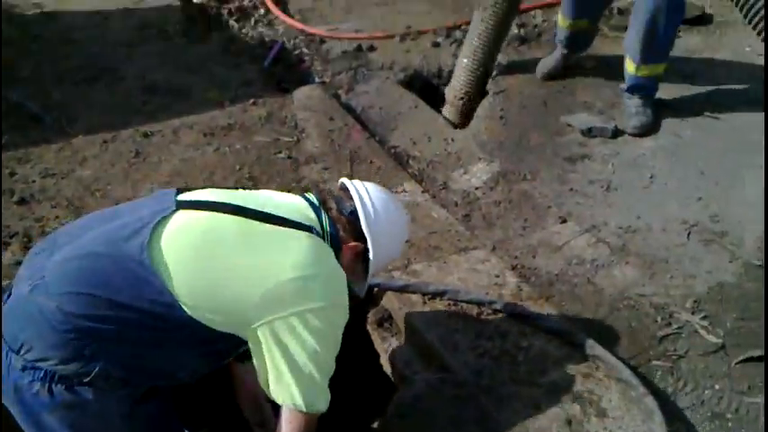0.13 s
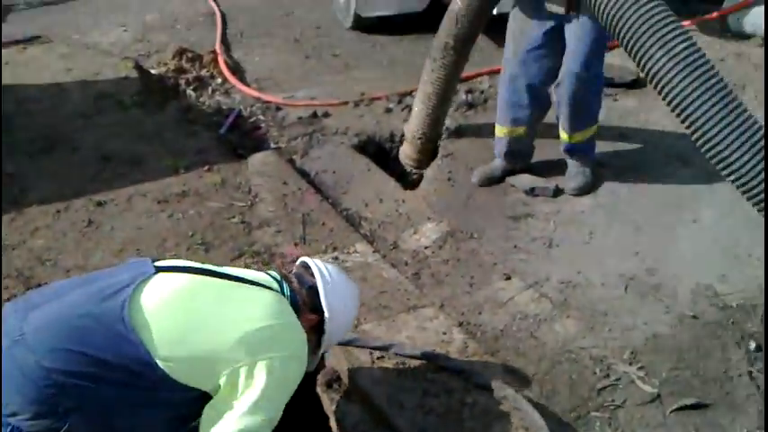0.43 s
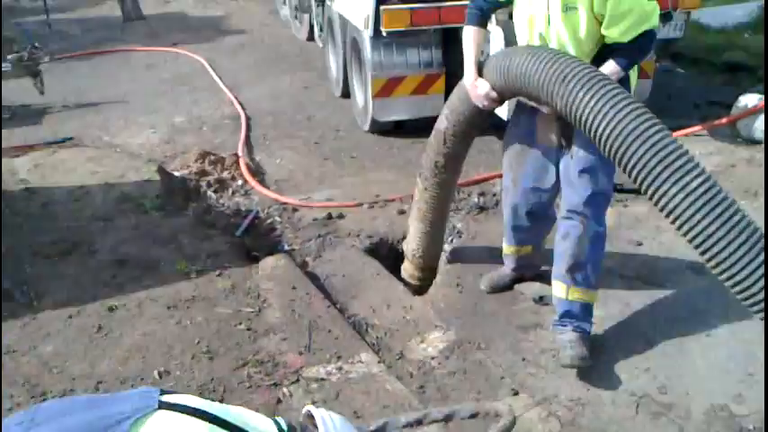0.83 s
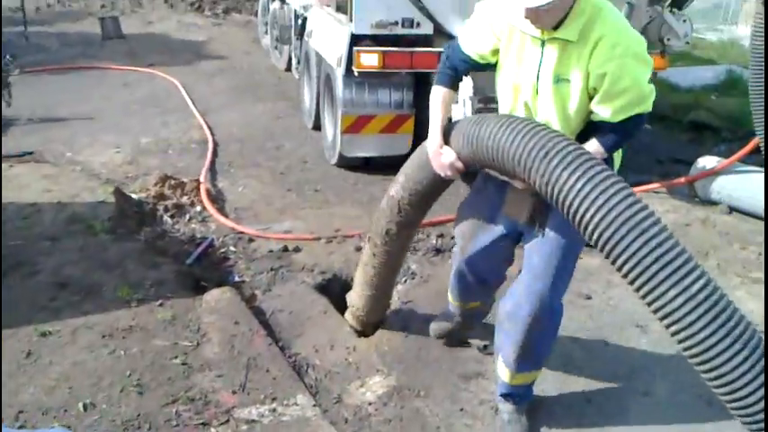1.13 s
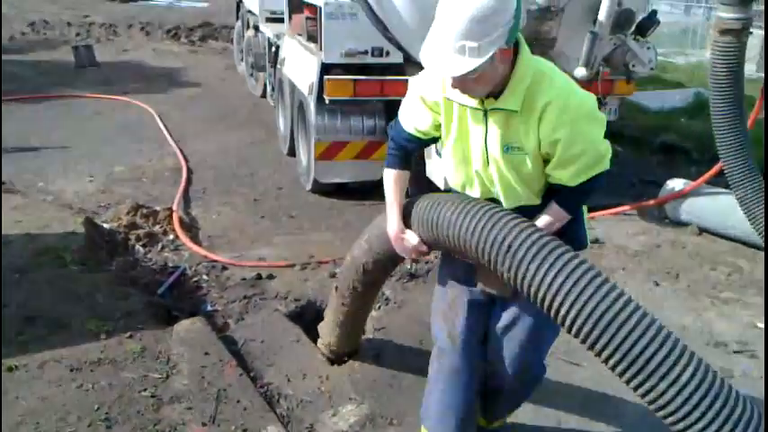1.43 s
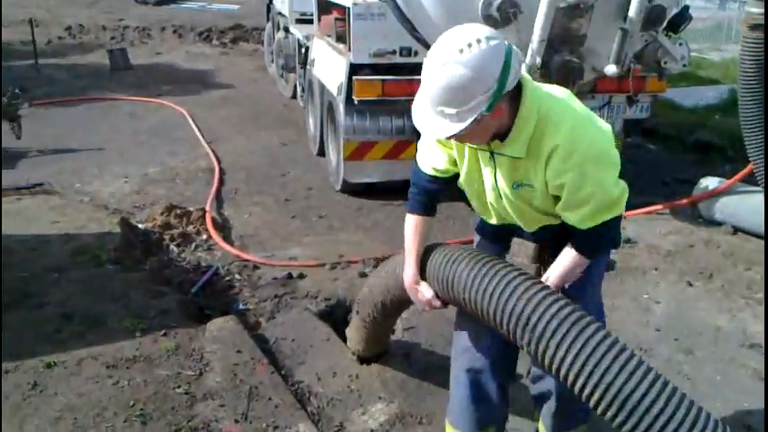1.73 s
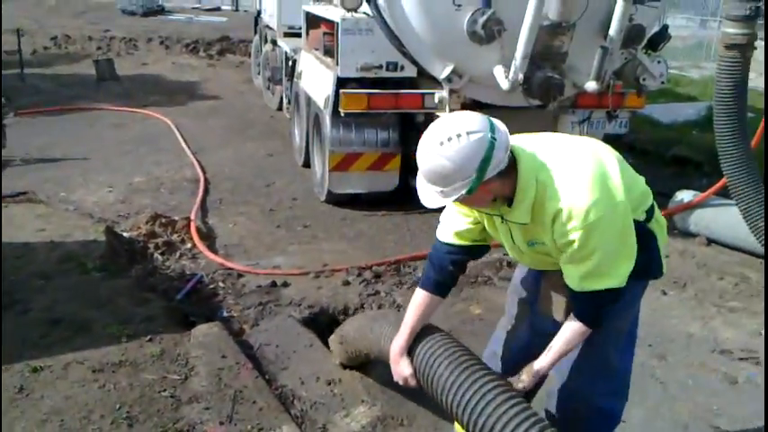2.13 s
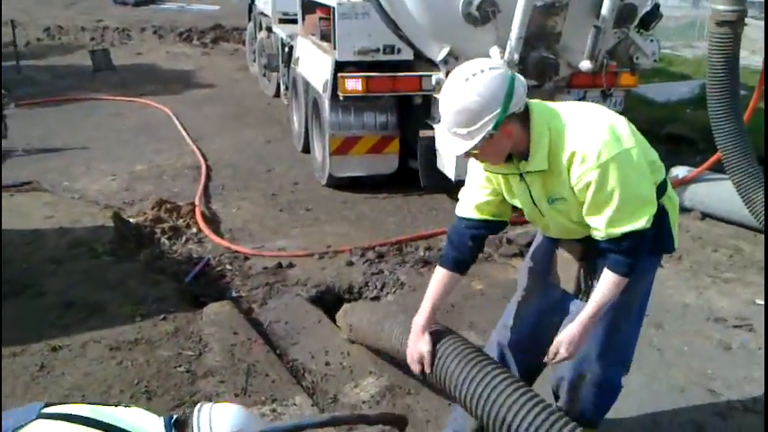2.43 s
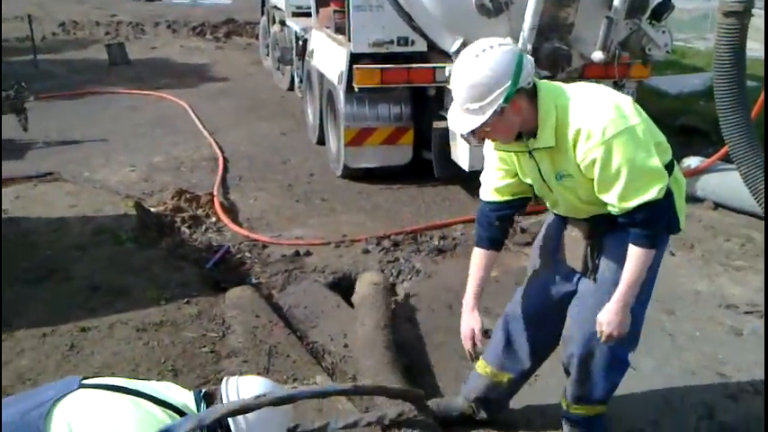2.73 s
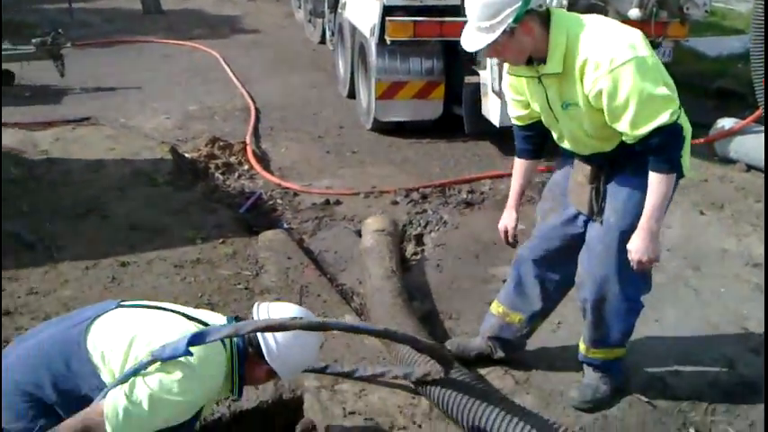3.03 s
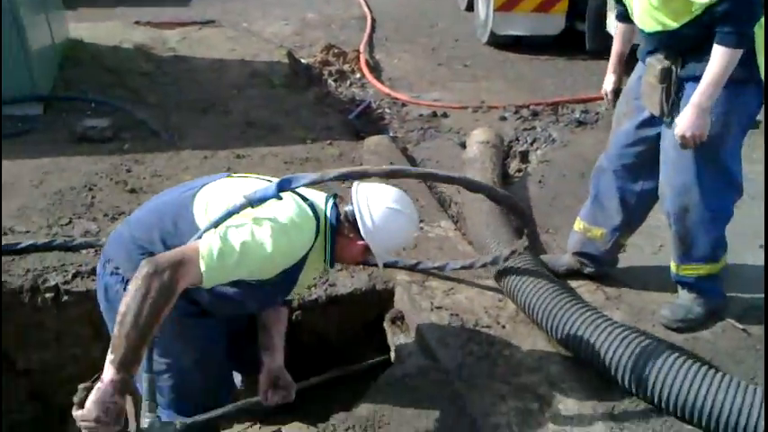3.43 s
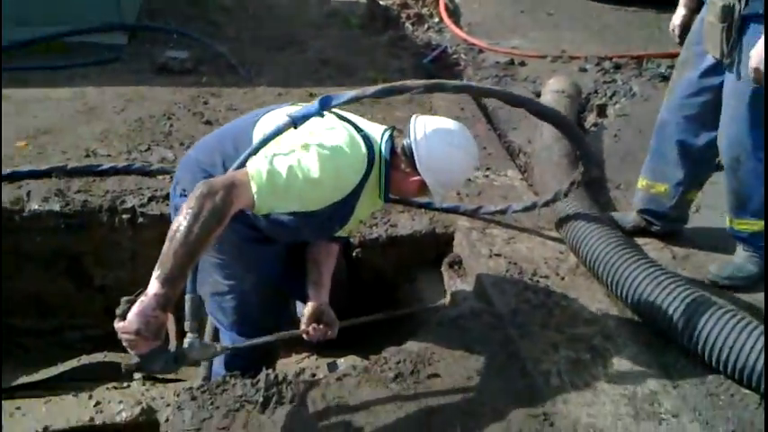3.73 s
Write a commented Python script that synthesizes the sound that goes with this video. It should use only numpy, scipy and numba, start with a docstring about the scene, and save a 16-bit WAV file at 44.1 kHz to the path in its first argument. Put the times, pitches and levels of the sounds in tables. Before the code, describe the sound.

A vacuum truck roars throughout at high steady revs: diesel clatter, humming blower tones swelling around 1.3 s, churning suction air. Sharp double hose clacks hit at about 0.9, 1.7, 2.6 and 3.4 s, the last heaviest. From 2.5 s a water jet bores into wet soil, slurping and gurgling; after 3.3 s spray hisses brighter while a hollow note climbs until the end. Outdoor mono pickup ducks under loud parts.

```python
"""Vacuum truck at high revs: diesel clatter and orders, blower tones, and suction rush as churning coloured noise.
The hose line gives a sharp double clack about every 0.85 s: contact noise into damped resonances.
Then a water lance bores into wet soil: noise bands churn and hiss, mud slurps in bursts, and the hole rings;
its note sinks at first, then climbs as the hole fills. The recorder's gain ducks under the loud parts."""
import sys
import numpy as np
from scipy import signal
from scipy.fft import rfft, irfft
from scipy.io import wavfile
from scipy.ndimage import uniform_filter1d, map_coordinates
from numba import njit

SR = 44100
rng = np.random.default_rng(int(sys.argv[2]) if len(sys.argv) > 2 else 0)


def store_wav(level_fs):
    """Save 16-bit WAV to argv[1]."""
    pcm = np.round(np.clip(np.atleast_2d(level_fs), -1, 1) * 32767)
    wavfile.write(sys.argv[1], SR, pcm.T.astype(np.int16))


N = 170667

# diesel: firings per cycle, rms speed wander as a share
CYCLE_HZ, FIRINGS_PER_CYCLE = 14.078, 8
SPEED_WANDER_SHARE, FIRING_DEPTH = 0.000685, 0.46
CLATTER_DB, RUSH_DB = -33.5, -29
# engine orders that stand out: (multiple of cycle rate [-], mid level [dB])
ENGINE_ORDERS = [(6, -57.5), (7, -53.5), (12, -52.5), (18, -43.5), (21, -51.5), (31, -45), (39, -48.5),
                 (42, -55), (71, -50), (72, -55.5), (75, -49.5), (77, -43.5), (78, -51.5), (80, -44),
                 (81, -45), (82, -59.5), (85, -40), (86, -57.5), (87, -45.5), (90, -54.5), (93, -42.5),
                 (99, -45), (100, -48), (107, -51.5), (108, -49), (111, -54.5), (123, -45.5)]
# diesel clatter spectrum: (frequency [Hz], relative density [dB per Hz])
CLATTER_SPECTRUM = [(40, -10.5), (190, -8.5), (370, -16), (600, -4.5), (900, -3.5), (1150, 0.5), (1500, -1),
                    (2000, -12), (2700, -14), (4300, -10.5), (6000, -33.5)]
# blower and pump tones: (frequency [Hz], mid level before swell [dB])
BLOWER_TONES = [(59.2, -54), (190.5, -53.5), (216.8, -45.5), (434, -55.5), (868, -48), (2876, -57)]
# swell added to all blower tones: (time [s], level [dB])
BLOWER_SWELL_DB = [(0, -8), (.6, -1), (1.3, 4), (2.2, 2.5), (3.87, -5)]
# suction rush spectrum: (frequency [Hz], relative density [dB per Hz])
RUSH_SPECTRUM = [(20, -20), (55, 1.5), (115, -2), (220, 1), (350, -4.5), (480, -3), (600, 3), (850, -4.5),
                 (1300, 0.5), (2000, 3), (2400, -7), (3000, -14.5), (3700, -12), (4400, -4), (4900, -12.5),
                 (5400, -19.5), (6000, -20), (6500, -27), (8000, -34), (9400, -32), (11000, -50.5)]
# clacks: (time [s], level before scaling by ring time [dB], ring time [s],
# centre of strongest ringing [Hz], thud peak scale [dB])
CLACK_EVENTS = [(0.923, -8, 0.0021, 3000, -45), (0.9343, -13.5, 0.0053, 3060, -45),
                (1.7288, -6, 0.0034, 2200, -48), (1.7407, -8, .004, 3700, -45),
                (2.5788, -1.5, 0.001, 1500, -27), (2.59, -11, 0.0047, 2390, -34),
                (3.431, 0.5, 0.001, 3040, -13), (3.442, -7.5, 0.0023, 3000, -23)]
# clack resonances: (frequency [Hz], nominal width [Hz], level before fall from centre [dB])
CLACK_RESONANCES = [(1210, 230, 7.5), (1630, 170, 7), (1880, 240, 1), (2810, 430, -0.5), (3840, 195, -2.5),
                    (4180, 310, 6.5), (5680, 290, -29), (8800, 1200, -15)]
CLACK_FALL_DB_PER_OCT = 5.5
THUD_HZ, THUD_DECAY_S = 70, 0.004
LANCE_OPENS_S, LANCE_RISE_S = 2.505, 0.02
# water lance: (time [s], splash in soil [dB], open spray [dB])
LANCE_LEVELS = [(2.5, -70, -86), (2.525, -27.5, -39), (2.57, -32, -28.5), (2.61, -23, -38),
                (2.66, -22, -45), (2.74, -20.5, -54), (2.9, -19, -54), (3.05, -17.5, -54), (3.2, -18, -59),
                (3.33, -16.5, -25.5), (3.38, -21.5, -21.5), (3.47, -31, -17), (3.55, -23, -16.5),
                (3.75, -23.5, -14.5), (3.87, -25, -10.5)]
# splash in soil: (frequency [Hz], relative density [dB per Hz])
SPLASH_SPECTRUM = [(100, -19), (170, -10.5), (310, 4.5), (460, -20), (700, 0.5), (880, -12.5), (1020, -1),
                   (1250, -1), (1600, 0), (2200, -4.5), (2600, -17), (3300, -8), (4400, -5.5),
                   (4900, -12.5), (5300, -24), (5900, -30.5), (6400, -21.5), (7200, -18.5), (8000, -26),
                   (9000, -24), (9700, -32.5), (11000, -28.5)]
# open spray: (frequency [Hz], relative density [dB per Hz])
SPRAY_SPECTRUM = [(120, -6.5), (330, -2.5), (500, -13.5), (800, -6), (1250, -4.5), (1900, -8),
                  (2400, -17.5), (2900, -5.5), (3600, -2.5), (4400, 0.5), (5200, -10), (6500, -13),
                  (7700, -23), (9000, -20), (11000, -28.5)]
GURGLES_PER_S, GURGLE_DB = 45, 2
# mud round the jet: (time [s], level [dB], centre [Hz])
SLURP_TRACK = [(2.6, -60, 1700), (2.67, -25.5, 1630), (2.72, -28, 1780), (2.8, -16.5, 1590),
               (2.85, -26, 1590), (3.06, -19, 1610), (3.25, -36, 1460), (3.4, -45, 1400)]
SLURP_WIDTH_HZ, SLURPS_PER_S, SLURP_DB = 240, 55, 4.5
# air in the hole: (time [s], lowest resonance [Hz], its level [dB],
# level of higher resonances [dB], rms pitch wobble [share])
HOLE_TRACK = [(2.6, 190.5, -41, -69, .1), (2.68, 162.8, -28, -33.5, 0.12), (2.78, 157.6, -27, -38, 0.08),
              (2.86, 157.2, -27.5, -34.5, 0.16), (2.95, 143.4, -25.5, -40, 0.057),
              (3.05, 166, -21.5, -36.5, 0.018), (3.18, 181, -25, -29, 0.02),
              (3.32, 187.2, -39.5, -34.5, 0.053), (3.38, 184.2, -23, -32.5, .02),
              (3.54, 221.5, -18, -31, 0.0088), (3.66, 234.8, -18, -24, 0.011),
              (3.78, 246.8, -17.5, -26, 0.012), (3.87, 254, -15.5, -21, 0.0065)]
# higher resonances of the hole: (multiple of lowest [-], nominal width [Hz], relative level [dB])
HOLE_OVERTONES = [(1.5, 78, -13), (2, 19, -10), (2.97, 11.2, 1.5), (3.97, 16, -1), (5.05, 27, -2)]
NOTE_FLUTTER_DB = 1.6
# recorder
SENSE_S, HOLD_S, RELEASE_S = 0.0051, 0.039, 0.032
THRESHOLD_DB, RATIO = -22, 1.6
TOP_HZ = 11080


def undb(db):
    """Decibels to gain."""
    return 10 ** (np.asarray(db) / 20)


def unit(x):
    """Scale to rms 1."""
    return x / np.sqrt(np.mean(x ** 2))


def noise():
    """White noise at about rms 1."""
    return rng.standard_normal(N)


def walk(rate_hz):
    """Random levels held 1 / rate_hz s and smoothed twice; rms 1."""
    hold = max(int(SR / rate_hz), 1)
    steps = noise()[np.arange(N) // hold]
    return unit(uniform_filter1d(uniform_filter1d(steps, hold), hold))


def curve(table, axis):
    """One table column, joined by straight lines in time."""
    rows = np.array(table)
    return np.interp(np.arange(N) / SR, rows[:, 0], rows[:, axis])


def tone(cycles):
    """Sine at rms 1 with a random start phase."""
    return np.sqrt(2) * np.sin(2 * np.pi * (cycles + rng.random()))


def colour(x, spectrum_points):
    """Weight x by (Hz, dB) points, falling below the first; rms 1."""
    hz, db = np.array(spectrum_points).T
    f_hz = np.maximum(np.fft.rfftfreq(N, 1 / SR), 1)
    gain = undb(np.interp(np.log(f_hz), np.log(hz), db))
    low_cut = np.minimum(f_hz / hz[0], 1)
    return unit(irfft(rfft(x) * gain * low_cut, N))


@njit
def svf(x, hz, width_hz):
    """State-variable band-pass with a moving centre, gain 1 there."""
    y, band, low = np.empty(len(x)), 0., 0.
    for i in range(len(x)):
        g, k = np.tan(np.pi * hz[i] / SR), width_hz / hz[i]
        v = (band + g * (x[i] - low)) / (1 + g * (g + k))
        band, low, y[i] = 2 * v - band, low + 2 * g * v, k * v
    return y


def ring(x, hz, width_hz):
    """Steep-sided resonance, fixed or moving: two stages, each twice the nominal width."""
    hz = hz * np.ones(len(x))
    return svf(svf(x, hz, 2. * width_hz), hz, 2. * width_hz)


def churn(x, rate_hz, depth_db, count=9):
    """Neighbouring overlapping bands of x swell and sink independently; rms 1."""
    f_hz = np.maximum(np.fft.rfftfreq(N, 1 / SR), 1)
    place = np.interp(np.log(f_hz), np.log([300, 9000]), [0, count - 1])
    spectrum = rfft(x)
    out = np.zeros(N)
    for k in range(count):
        band = irfft(spectrum * np.maximum(1 - abs(place - k), 0), N)
        out += band * undb(depth_db * walk(rate_hz))
    return unit(out)


def engine():
    """Cycle-repeating clatter plus noise, throbbing at the firing rate, with strong orders on top."""
    turns = np.cumsum(CYCLE_HZ * (1 + SPEED_WANDER_SHARE * walk(2))) / SR
    size = int(SR / CYCLE_HZ)
    # flat spectrum, random phase: one cycle of clatter
    pattern = irfft(np.exp(2j * np.pi * rng.random(size // 2 + 1)), size)
    repeated = unit(map_coordinates(pattern, [turns % 1 * size], mode="grid-wrap"))
    knocks = repeated + 0.75 * noise()
    throb = 1 + FIRING_DEPTH * np.cos(2 * np.pi * FIRINGS_PER_CYCLE * turns)
    orders = sum(undb(db + 0.59 * walk(3.8)) * tone(k * turns) for k, db in ENGINE_ORDERS)
    return undb(CLATTER_DB) * colour(knocks * throb, CLATTER_SPECTRUM) + orders


def suction():
    """Blower tones wavering together in pitch, over the churning rush of air in the hose."""
    warped_s = np.cumsum(1 + 0.00346 * walk(3.277)) / SR
    tones = sum(undb(db + 0.83 * walk(4.58)) * tone(hz * warped_s) for hz, db in BLOWER_TONES)
    rush = churn(colour(noise(), RUSH_SPECTRUM), rate_hz=8.98, depth_db=1.9)
    return undb(curve(BLOWER_SWELL_DB, axis=1)) * tones + undb(RUSH_DB) * rush


def clacks():
    """Brief decaying contact noise drives well-damped resonances, over a dull decaying thud."""
    out, t_s = np.zeros(N), np.arange(SR // 16) / SR
    thud = np.sin(2 * np.pi * THUD_HZ * t_s) * np.exp(-t_s / THUD_DECAY_S)
    for start_s, db, ring_s, centre_hz, thud_db in CLACK_EVENTS:
        push = rng.standard_normal(len(t_s)) * np.exp(-t_s / ring_s)
        body = np.zeros(len(t_s))
        for hz, width_hz, mode_db in CLACK_RESONANCES:
            fall_db = CLACK_FALL_DB_PER_OCT * abs(np.log2(hz / centre_hz))
            body += undb(mode_db - fall_db) * unit(ring(push, hz, width_hz))
        clack = undb(db) * unit(body) * np.sqrt(ring_s / t_s[-1])
        i = int(start_s * SR)
        out[i:i + len(t_s)] += clack + undb(thud_db) * thud
    return out


def lance():
    """The jet splashes in wet soil, then sprays more freely and brightly: two flickering noises."""
    splash = colour(noise() * undb(0.98 * walk(400)), SPLASH_SPECTRUM)
    splash = churn(splash, rate_hz=GURGLES_PER_S, depth_db=GURGLE_DB)
    spray = colour(noise() * undb(0.7 * walk(600)), SPRAY_SPECTRUM)
    spray = churn(spray, rate_hz=45, depth_db=1.3)
    return undb(curve(LANCE_LEVELS, axis=1)) * splash + undb(curve(LANCE_LEVELS, axis=2)) * spray


def slurp():
    """Wet mud flaps round the jet: narrow-band noise in quick, uneven bursts."""
    bursts = unit(undb(SLURP_DB * walk(SLURPS_PER_S)))
    mud = unit(ring(noise(), curve(SLURP_TRACK, axis=2), SLURP_WIDTH_HZ))
    return undb(curve(SLURP_TRACK, axis=1)) * bursts * mud


def howl(hz, width_hz):
    """Noise-fed resonance, its slow swells levelled to about rms 1."""
    note = ring(noise(), hz, width_hz)
    return note / np.sqrt(uniform_filter1d(note ** 2, SR // 14) + 1e-18)


def hole():
    """The jet sounds the air like a pipe; the note steadies and climbs as water shortens the column."""
    hz = curve(HOLE_TRACK, axis=1) * (1 + curve(HOLE_TRACK, axis=4) * walk(70))
    note = np.sqrt(2) * np.sin(2 * np.pi * np.cumsum(hz) / SR)
    note = note * undb(NOTE_FLUTTER_DB * walk(50))
    upper = sum(undb(db) * howl(k * hz, width_hz) for k, width_hz, db in HOLE_OVERTONES)
    return undb(curve(HOLE_TRACK, axis=2)) * note + undb(curve(HOLE_TRACK, axis=3)) * upper


def scene():
    """Truck throughout; water sounds begin when the lance opens. One channel on both sides."""
    valve = np.clip((np.arange(N) / SR - LANCE_OPENS_S) / LANCE_RISE_S, 0, 1)
    water = lance() + slurp() + hole()
    mono = engine() + suction() + clacks() + valve * water
    return np.array([mono, mono])


@njit
def ride(wanted, hold, release):
    """Gain drops at once to the wanted value, holds, then recovers towards 1; times in samples."""
    out, gain, wait = np.empty(len(wanted)), 1., 0.
    for i in range(len(wanted)):
        wait -= 1
        if wanted[i] < gain:
            gain, wait = wanted[i], hold
        elif wait < 0:
            gain += (1 - gain) / release
        out[i] = gain
    return out


def record(dry):
    """Mono recorder: automatic gain control, then a steep top cut."""
    power = uniform_filter1d(dry[0] ** 2, int(SENSE_S * SR))
    loudness = np.sqrt(abs(power)) + 1e-9
    wanted = np.minimum(undb(THRESHOLD_DB) / loudness, 1) ** (1 - 1 / RATIO)
    gain = ride(wanted, float(HOLD_S * SR), float(RELEASE_S * SR))
    # order 16, 0.1 dB ripple, 90 dB stop band
    top_cut = signal.ellip(16, 0.1, 90, TOP_HZ, fs=SR, output="sos")
    return signal.sosfilt(top_cut, dry * gain)


dry = scene()
out = record(dry)
store_wav(out)
```